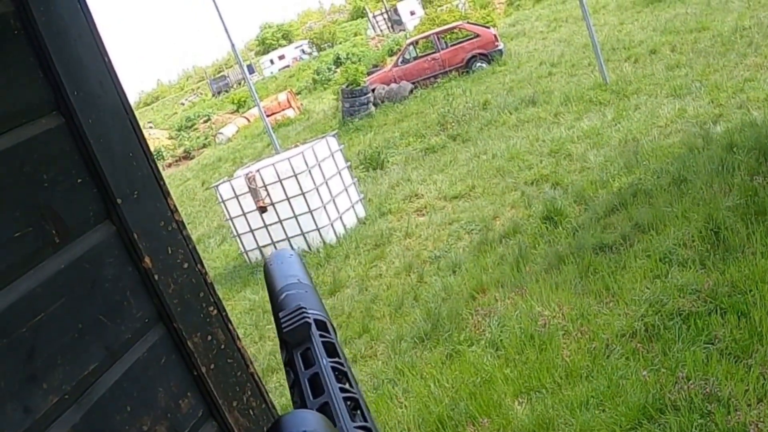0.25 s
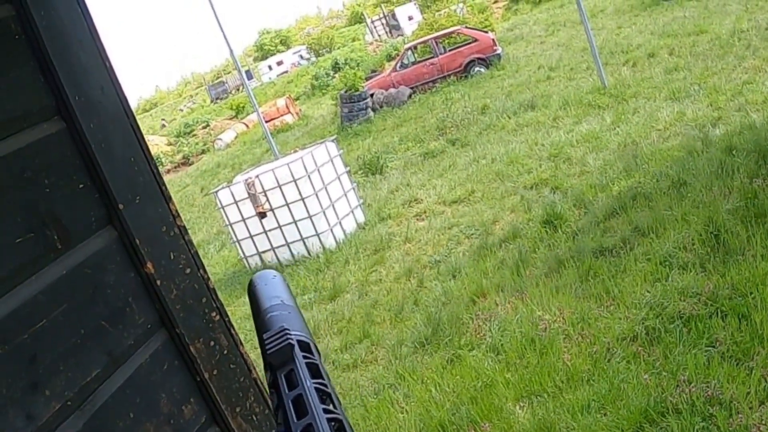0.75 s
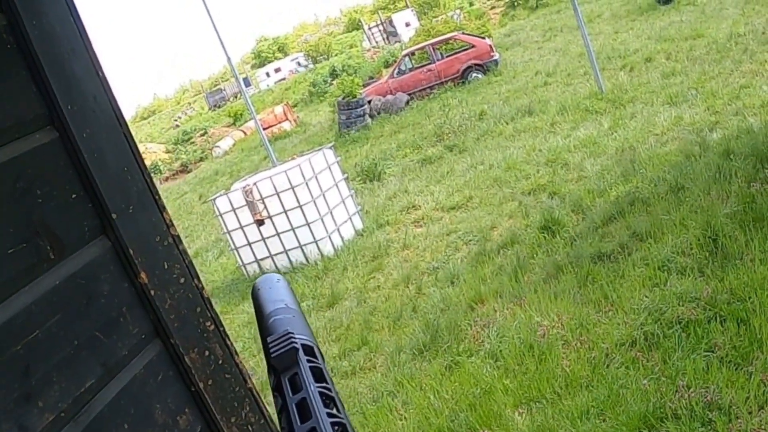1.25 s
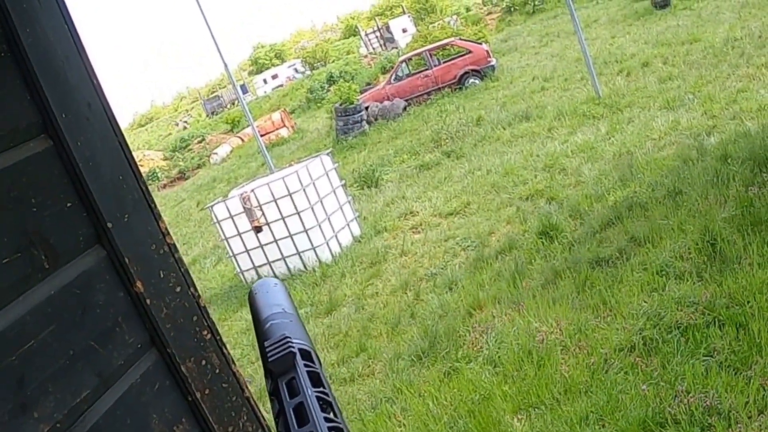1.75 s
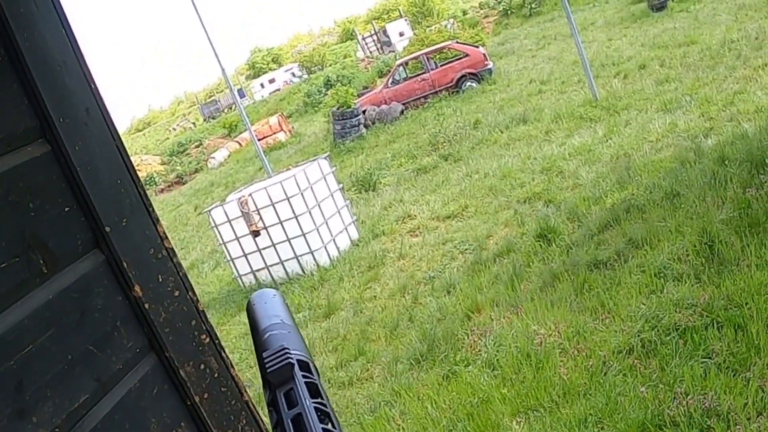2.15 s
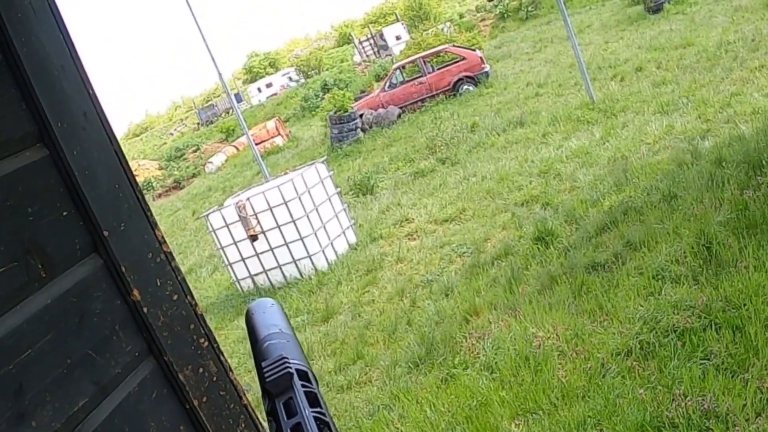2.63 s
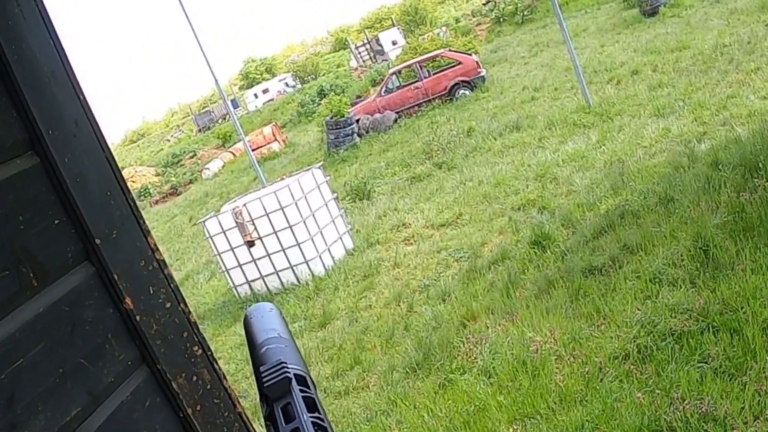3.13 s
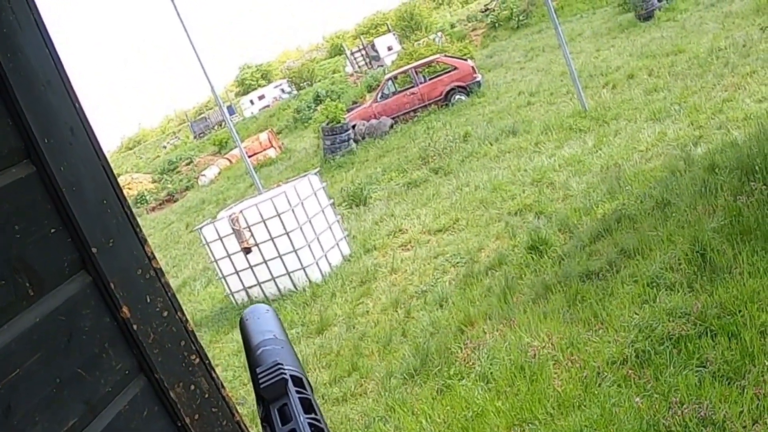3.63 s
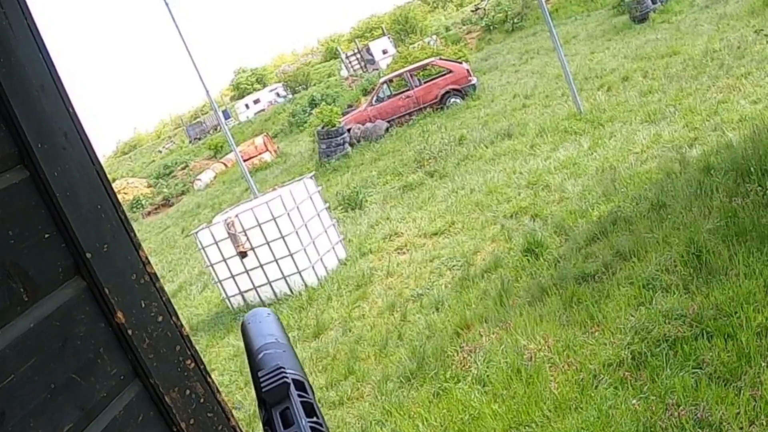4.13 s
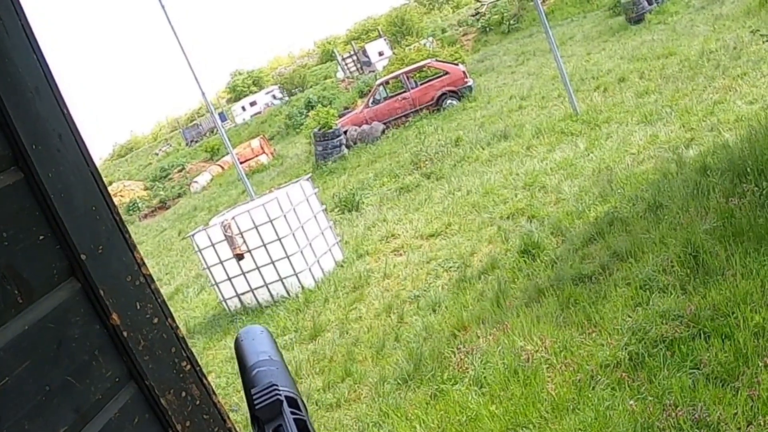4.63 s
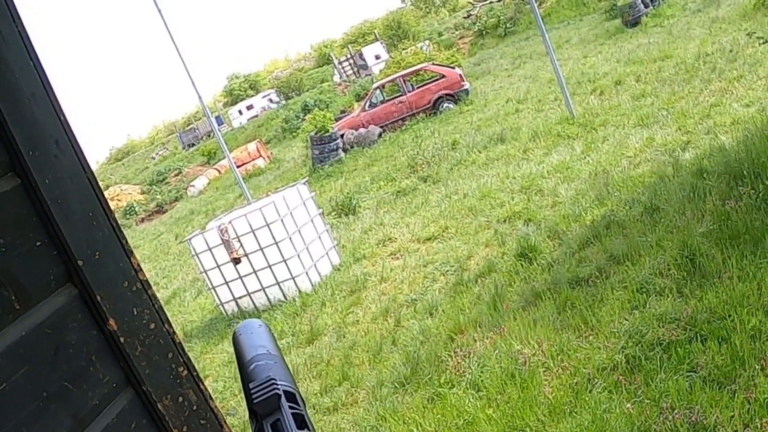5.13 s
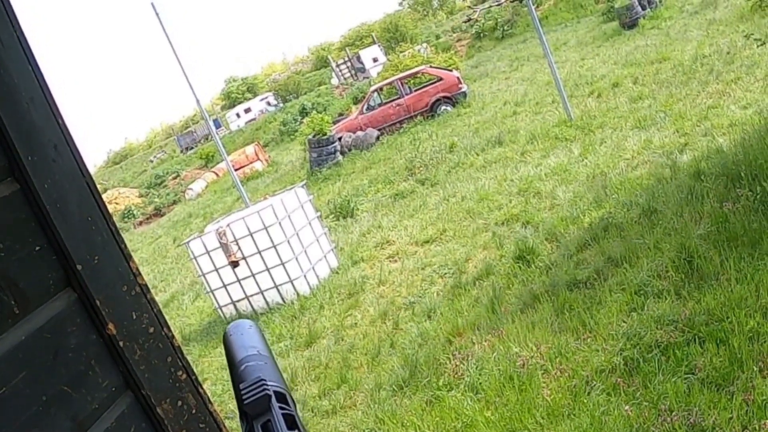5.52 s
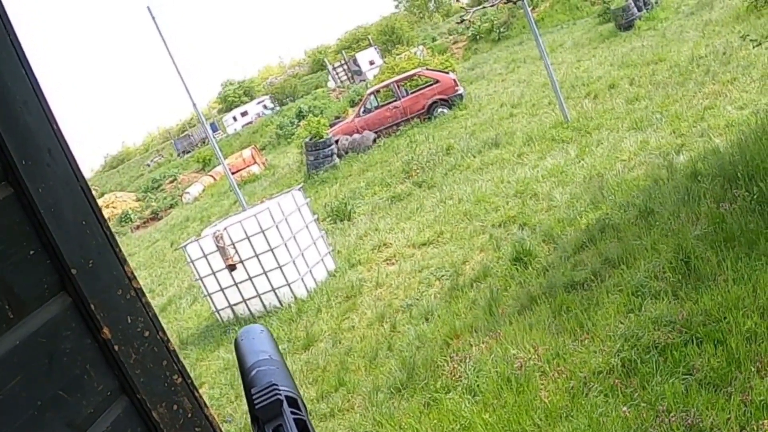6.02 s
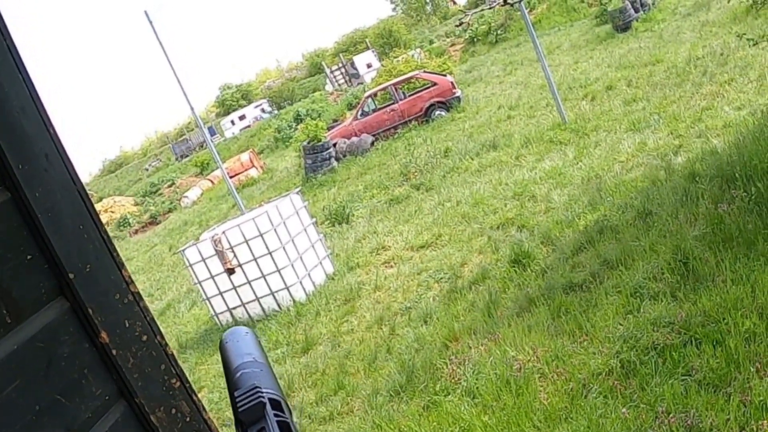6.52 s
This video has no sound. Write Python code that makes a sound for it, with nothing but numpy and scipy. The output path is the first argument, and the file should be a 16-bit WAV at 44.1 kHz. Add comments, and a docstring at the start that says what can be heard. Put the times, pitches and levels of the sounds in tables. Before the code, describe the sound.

From the doorway of a wooden hut facing grass, a motor-driven airsoft gun repeats quick dry shots right beside the microphone. Gears grind and whine, the piston slams, the stock thuds and the rattle dies at once. The rhythm is slightly uneven and runs right through. Another gun a few steps off adds rising whirs and lighter cracks, sparse at first, more regular later, over very faint open air.

```python
"""Five or six dry shots a second: an electric airsoft rifle fires from the doorway of a wooden hut.
In each shot the motor winds the gears up, the piston slams home, the stock thumps and the spring rings.
A second electric gun whirs and cracks a few steps away; small knocks fall between the shots.
Whines are swept partials, rings and thumps are struck resonators, rattles and cracks are coloured noise.
A short wooden tail follows the guns, over faint outdoor air."""
import sys
import numpy as np
from scipy import signal
from scipy.fft import rfft, irfft
from scipy.io import wavfile

SR = 44100
rng = np.random.default_rng(int(sys.argv[2]) if len(sys.argv) > 2 else 0)


def to_wav(s):
    """Save 16-bit WAV."""
    ch = np.atleast_2d(s).T  # columns
    pcm = np.round(np.clip(ch, -1, 1) * 32767)  # PCM
    wavfile.write(sys.argv[1], SR, pcm.astype(np.int16))


N = 298557
TIME = np.arange(N) / SR
HZ = np.maximum(np.fft.rfftfreq(2 * N, 1 / SR), 1)

# shots of the near rifle: (piston release [s], firmness [dB], clatter [dB])
SHOTS = [(0.1309, 1.7, 8), (0.3683, -3.6, 4.1), (0.5819, 0, -0.5), (0.7694, -2, -1.7), (0.9823, -7, 0.1),
         (1.1445, -2.3, -1.5), (1.332, 2.4, 1.5), (1.4952, -1.5, -0.3), (1.6609, 0.8, 0.5),
         (1.8244, -2.5, -1.3), (2.0386, -2, -2.0), (2.2524, -3, 0), (2.4153, -6, -1.8),
         (2.5786, -2.4, -2.7), (2.7174, -6, -1), (2.9074, -2.5, -0.5), (3.0483, -0.5, 0.7),
         (3.236, -1.0, 1.5), (3.401, 1.6, 1.5), (3.5635, -0.0, 3), (3.73, 2.5, -0.2), (3.8938, -1.8, 1.5),
         (4.0596, 0, -0.4), (4.2487, 1.5, 0.5), (4.4119, -1, -2.2), (4.6009, -1.7, 0.8), (4.7896, 2, -1),
         (4.955, -0.5, 3), (5.1445, -1.7, -2), (5.3343, 2.5, 1.6), (5.4988, 2.3, 3.1), (5.6886, 1.5, 0.5),
         (5.8792, 0.8, 1.5), (6.0692, 4, 1.6), (6.258, 0, 0.5), (6.4235, 3.5, 1), (6.6141, 3.5, 2.5)]
# colour of the hard body, upper part: (frequency [Hz], relative level per Hz [dB])
SHELL = [(820, -32), (1400, 2), (1530, -7), (1740, 5.5), (2150, -14), (2620, 0.5), (3290, -2.5), (3590, 1),
         (4050, -12), (4890, -0.5), (5450, -13), (7560, -18), (8270, -27.5), (10800, -35), (15000, -81)]
# colour of the hard body, lower part: (frequency [Hz], relative level per Hz [dB])
SHELL_LOW = [(60, -7), (170, 9.5), (250, 18.5), (330, 5), (430, 5.5), (650, -5), (820, -3), (1000, 2),
             (1200, 3)]
# stereo balance of the body's rattle: (frequency [Hz], left minus right [dB])
EARS = [(60, -1), (87, 14), (130, -3), (180, 14.5), (260, -3), (380, 10), (550, 2), (790, -4.5),
        (1140, 7.5), (1650, -2), (2380, 5.5), (3440, 10), (4970, -23.5), (7180, 8.5), (10400, 8),
        (15000, 0)]

# every shot runs alike: the piston flies, slams home and bounces, the motor brakes
FLIGHT_S, BOUNCE_S = .0067, .0147   # flight counts from the release, bounce from the slam
BRAKE_S = .034   # after the release


def from_db(db):
    """Decibels to gain."""
    return 10 ** (np.asarray(db) / 20)


def at_hz(points):
    """A table read on a log-frequency axis."""
    hz, value = np.transpose(points)
    order = np.argsort(hz)
    return np.interp(np.log(HZ), np.log(hz[order]), value[order])


def clicks(times, sizes):
    """One impulse at each time."""
    out = np.zeros(N)
    at = np.clip((np.asarray(times) * SR).astype(int), 0, N - 1)
    np.add.at(out, at, sizes)
    return out


def soften(x, cut_hz):
    """A double one-pole low-pass, which rounds an impulse into a soft push."""
    pole = np.exp(-2 * np.pi * cut_hz / SR)
    return signal.lfilter([(1 - pole) ** 2], [1, -2 * pole, pole * pole], x + 1e-18)


def ring(force, hz, t60):
    """Velocity of a decaying mode; a unit impulse rings it with a height near 1."""
    radius = from_db(-60 / (t60 * SR))
    angle = 2 * np.pi * hz / SR
    force = force + 1e-15 * rng.standard_normal(N)
    return signal.lfilter([1, -1], [1, -2 * radius * np.cos(angle), radius * radius], force)


def dying(hits, t60):
    """An envelope that jumps at each hit and dies away exponentially."""
    return signal.lfilter([1], [1, -from_db(-60 / (t60 * SR))], hits + 1e-18)


def rattle(envelope, colour, ears, grain_db):
    """Noise as dense tiny contacts under an envelope, coloured by a body and spread in stereo."""
    # left-right correlation: (frequency [Hz], correlation)
    likeness = [(100, 0.98), (300, 0.82), (650, 0.27), (1200, 1), (2500, 0.17), (4500, 0.12), (9000, 0.025)]
    knots = TIME[::40]
    grain = from_db(grain_db * np.interp(TIME, knots, rng.standard_normal(len(knots))))
    grain = grain / np.sqrt(np.mean(grain ** 2))
    mid, side = rfft(rng.standard_normal((2, N)) * envelope * grain, 2 * N)
    alike = np.clip(at_hz(likeness), -1, 1)
    both = np.sqrt(1 + alike) * mid + np.sqrt(1 - alike) * side * [[1], [-1]]
    # colour and balance keep the overall power
    gain = from_db(at_hz(colour))
    gain = gain / np.sqrt(np.mean(gain ** 2))
    pan = from_db(at_hz(ears) * [[.5], [-.5]])
    pan = pan / np.sqrt(np.mean(pan ** 2, axis=0))
    return irfft(both * gain * pan)[:, :N]


def place(x, pan_db):
    """A source in stereo: it reaches the right three samples before the left; positive pan lifts the left."""
    late_left = np.pad(x, (3, 0))[:N]
    return np.array([late_left, x]) * from_db([[pan_db / 2], [-pan_db / 2]])


def outdoor_air(level_db, ears):
    """Smooth, faint outdoor noise with a low rumble."""
    # colour of the air: (frequency [Hz], relative level per Hz [dB])
    air_colour = [(13, -44), (22, 16), (89, 6.5), (257, -18), (686, -48), (1220, -26), (2160, -38.5),
                  (2610, -39), (4900, -45), (15000, -79)]
    return rattle(from_db(level_db), air_colour, ears, grain_db=0)


def gears(times, wind_s, overrun_s, attack_s, stop_t60, start_hz, top_hz, spin_up_s, coast_s,
          whine_db, loaded_whine_db, free_whine_db, grind_db, loaded_grind_db, speed_spread, wobble):
    """As each shot cocks the spring, teeth whine less and grind more; returns whine and grind envelope."""
    # partials of the gear whine: (multiple of the tooth rate, relative level [dB])
    partials = [(1, -1.5), (1.5, -10), (3, -9.5), (4, -10.5)]
    whine, grind = np.zeros(N), np.zeros(N)
    for at, (fast, slow) in zip(times, rng.standard_normal((len(times), 2))):
        wind = wind_s * (1 + .05 * slow)
        on = np.flatnonzero((TIME > at - wind) & (TIME < at + overrun_s + stop_t60))
        t = TIME[on] - at + wind
        load = np.minimum(t / wind, 1) ** 2
        coasting = np.maximum(t - wind - overrun_s, 0)
        # the pitch spins up, then falls as the motor coasts
        tooth_hz = top_hz + (start_hz - top_hz) * np.exp(-t / spin_up_s)
        tooth_hz = tooth_hz * np.exp(-coasting / coast_s)
        shake = np.interp(np.arange(len(on)) / 100, np.arange(300), rng.standard_normal(300))
        phase = 2 * np.pi * np.cumsum(tooth_hz * (1 + speed_spread * fast + wobble * shake)) / SR
        drive = np.minimum(t / attack_s, 1) * np.exp(-np.log(1000) * coasting / stop_t60)
        # after the release the teeth whine free of the spring
        tone_db = np.where(t < wind, whine_db + load * (loaded_whine_db - whine_db), free_whine_db)
        tone = sum(from_db(db) * np.sin(k * phase) for k, db in partials)
        whine[on] += drive ** 2 * from_db(tone_db) * tone
        # grinding pulses once a tooth
        grind_gain = from_db(grind_db + load * (loaded_grind_db - grind_db))
        grind[on] += drive * grind_gain * (1 + .5 * np.cos(phase))
    return whine, grind


def second_gun():
    """A rising whir of swept partials, then noise bursts: the piston's release click, crack and rebound."""
    # shots of the second gun: (time [s], level [dB])
    cracks = [(0.0857, -10.5), (0.1771, -9.5), (0.6174, -15), (0.7194, -15), (0.8028, -16), (2.559, -13),
              (2.8696, -14.5), (3.109, -13.5), (3.358, -14), (3.6034, -13.5), (4.4344, -13.5),
              (4.6974, -14), (4.9247, -12.5), (5.1714, -13.5), (5.5124, -16), (5.7654, -12.5),
              (6.0367, -10.5), (6.287, -12), (6.54, -11.5)]
    # colour of the crack: (frequency [Hz], relative level per Hz [dB])
    crack_colour = [(290, -26), (500, -13), (847, -9), (1130, 2), (1370, -7.5), (1520, -0.5), (2230, -18),
                    (2430, -4), (2640, -12.5), (3180, -5), (4540, -10.5), (4940, -3.5), (5380, -17),
                    (10700, -42.5), (15000, -60)]
    # stereo balance of the crack: (frequency [Hz], left minus right [dB])
    crack_ears = [(60, -8), (110, -4), (200, 5), (380, -4), (700, 3.5), (1290, 3), (2380, 8), (4400, -1.5),
                  (8120, 2), (15000, 13)]
    times, level_db = np.transpose(cracks)
    # one more shot is due just past the end, so only its whir is heard
    whine, grind = gears(
        [*times, 6.795], wind_s=.092, overrun_s=0.0118, attack_s=0.031, stop_t60=0.33,
        start_hz=858, top_hz=1724, spin_up_s=.07, coast_s=.14,
        whine_db=-36, loaded_whine_db=-54, free_whine_db=-67,
        grind_db=-22.5, loaded_grind_db=-13.5, speed_spread=0.0385, wobble=0.039)
    hits = np.zeros(N)
    for delay_s, db in [(-.006, -13), (0, -5.5), (.0065, -14)]:   # release, crack, rebound
        hits = hits + clicks(times + delay_s, from_db(level_db + db))
    crack = from_db(-5.5) * soften(dying(hits, t60=0.055), 180)
    envelope = np.hypot(from_db(-28) * grind, crack)
    return rattle(envelope, crack_colour, crack_ears, grain_db=1.5) + place(whine, pan_db=3.0)


def grip_growl(attack_hz, t60, firm_share):
    """The motor's starting jolt sets the grip's modes growling, more so in a firm shot."""
    # modes of the grip: (frequency [Hz], relative level [dB], t60 [s])
    grip_modes = [(256, -45.5, 0.14), (297.4, -42.5, 0.11), (371, -50.5, .08)]
    times, firm_db, _ = np.transpose(SHOTS)
    jolts = clicks(times - .044, from_db(firm_share * firm_db))   # the motor starts before the release
    shake = soften(dying(jolts, t60), attack_hz) * rng.standard_normal(N)
    return sum(from_db(db) * ring(soften(shake, 382), hz, decay) for hz, db, decay in grip_modes)


def shell_sound(envelope):
    """Contacts inside the rifle: a broad noise rattle, and the narrow rings of its metal parts."""
    # rings of barrel and handguard: (frequency [Hz], relative level [dB], t60 [s], left minus right [dB])
    metal = [(363, -43, 0.052, 16), (1700, -54, 0.033, 1), (2550, -71, 0.046, 6), (2960, -55, 0.03, 9),
             (3100, -34.5, 0.025, 5), (3630, -46.5, 0.028, -12), (4220, -43.5, 0.046, 21.5),
             (4960, -39.5, 0.055, -8), (5066, -41.5, 0.03, -13)]
    rings = 0
    for hz, db, t60, pan_db in metal:
        scrape = envelope * rng.standard_normal(N)
        rings = rings + place(from_db(db) * ring(scrape, hz, t60), pan_db)
    return rings + rattle(envelope, np.vstack([SHELL_LOW, SHELL[1:]]), EARS, grain_db=2.0)


def stock_thump(tempo_spread, jitter_s, spread_db):
    """Recoil and brake push the stock back, the piston forward; firm shots pass on more upper modes."""
    # low modes; close pairs trade energy in their boom: (frequency [Hz], relative level [dB], t60 [s])
    stock_modes = [(58.9, 3, .098), (60.6, 6.7, .065), (88.9, 1.5, .031), (167.7, 5.2, .082),
                   (164.6, 5, .103), (236, -14.4, .077), (270, -20, .103)]
    slam_db, slam_hz = 3, 164   # how hard and how softly the piston lands
    times, firm_db, _ = np.transpose(SHOTS)
    tempo = 1 + tempo_spread * rng.standard_normal(len(times))

    def push(delay_s, db, softness_hz):
        """The same push in every shot, a little uneven in time and strength."""
        late, strength = rng.standard_normal((len(times), 2)).T
        at = times + delay_s * tempo + jitter_s * late
        return soften(clicks(at, from_db(db + spread_db * strength)), softness_hz)

    recoil = push(0, db=18, softness_hz=36.7)
    brake = push(BRAKE_S, db=-0.03, softness_hz=209)
    slam = push(FLIGHT_S, slam_db, slam_hz)
    bounce = push(FLIGHT_S + BOUNCE_S, slam_db - 9.5, slam_hz)
    settle = push(.0516, db=4, softness_hz=79.4)
    force = slam + bounce - recoil - brake + settle
    firm_force = force * from_db(np.interp(TIME, times, firm_db))
    modes = 0
    for k, (hz, db, t60) in enumerate(stock_modes):
        sign = (-1) ** (k + 1)   # neighbours in the table move in opposite senses
        modes = modes + sign * from_db(db) * ring(firm_force if hz > 130 else force, hz, t60)
    # a low sway near 38 Hz follows each release
    sway = from_db(-21) * ring(soften(clicks(times, 1), 77), hz=38.5, t60=0.16)
    return modes + sway


def spring_ring(delay_s, spread_db, swell_t60):
    """The piston's arrival rings each mode unevenly; the ring swells as the spring is shaken."""
    # modes of spring and gearbox: (frequency [Hz], relative level [dB], t60 [s])
    spring_modes = [(963, -26.5, 0.049), (1192, -20.5, 0.097), (1210, -37.5, 0.27), (1130, -45, 0.041),
                    (1780, -52, 0.039), (2560, -17.5, 0.018)]
    times, firm_db, _ = np.transpose(SHOTS)
    out = 0
    for hz, db, t60 in spring_modes:
        strike_db = db + firm_db + spread_db * rng.standard_normal(len(times))
        force = soften(clicks(times + delay_s, from_db(strike_db)), 2460)
        # taking away a copy with its own decay shapes the swell
        out = out + ring(force, hz, t60) - ring(force, hz, swell_t60)
    return out


def rifle():
    """Gear whine and grinding, hard clacks with a rattling tail, spring ring, growl and thump."""
    times, _, clatter_db = np.transpose(SHOTS)
    whine, grind = gears(
        times, wind_s=.043, overrun_s=.031, attack_s=0.017, stop_t60=0.14,
        start_hz=723.4, top_hz=1220, spin_up_s=.008, coast_s=0.13,
        whine_db=-28, loaded_whine_db=-42.5, free_whine_db=-32,
        grind_db=-11, loaded_grind_db=-4.5, speed_spread=0.01198, wobble=0.015)
    # the last tooth lets go of the piston, then slam, bounce and brake clack, each softer than the last
    hits = clicks(times - .004, from_db(-4 + clatter_db))
    for k, delay_s in enumerate((FLIGHT_S, FLIGHT_S + BOUNCE_S, BRAKE_S)):
        clack_db = 1.37 + clatter_db - k * 2.8 + 2.6 * rng.standard_normal(len(times))
        hits = hits + clicks(times + delay_s + .0022, from_db(clack_db))
    tail = from_db(-26.0) * dying(hits, t60=0.044)
    snap = from_db(-33.0) * dying(hits, t60=0.0021)
    shell = shell_sound(np.hypot(from_db(-26.5) * grind, tail + snap))
    spring = from_db(6) * spring_ring(delay_s=.008, spread_db=0.84, swell_t60=0.027)
    thump = from_db(0.33) * stock_thump(tempo_spread=0.012, jitter_s=0.00027, spread_db=0.47)
    growl = from_db(-10) * grip_growl(attack_hz=150, t60=0.43, firm_share=0.91)
    return shell + place(whine + spring, pan_db=4) + place(thump + growl, pan_db=1.5)


def knocks():
    """Short dry knocks of hard plastic: dying bursts of body-coloured noise."""
    # light knocks: (time [s], level [dB])
    knock_table = [(0.435, -32), (1.2141, -30.5), (1.584, -22), (1.9027, -32), (2.805, -23.5),
                   (2.9877, -29.5), (3.6507, -21.5), (6.3505, -22)]
    times, level_db = np.transpose(knock_table)
    envelope = dying(clicks(times, from_db(level_db - 8.5)), t60=0.096)
    return rattle(envelope, np.vstack([SHELL_LOW, SHELL[1:]]), EARS, grain_db=4.5)


def hut(x):
    """A short diffuse noise tail from the boards; the bass escapes through the open door."""
    t = TIME[:SR // 2]
    t60_s, cut_hz, level_db = 0.14, 1470, -26.5
    tail = soften(rng.standard_normal((2, len(t))), cut_hz) * from_db(-60 * t / t60_s) * (t > .005)
    tail = signal.sosfilt(signal.butter(2, 220, "high", fs=SR, output="sos"), tail)
    tail = tail / np.sqrt(np.sum(tail ** 2, axis=1, keepdims=True))
    return from_db(level_db) * signal.fftconvolve(x, tail, axes=1)[:, :N]


def scene():
    """Both guns and the knocks in the hut over faint outdoor air."""
    guns = rifle() + second_gun() + knocks()
    air = outdoor_air(level_db=-34.5, ears=[(100, 1.3), (5000, 0.2)])
    return guns + hut(guns) + air


def record(dry):
    """A steep low-pass cuts the top above 15.2 kHz."""
    return signal.sosfilt(signal.ellip(10, .1, 70, 15200, fs=SR, output="sos"), dry)


dry = scene()
out = record(dry)
to_wav(out)
```